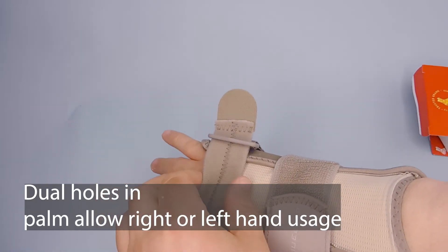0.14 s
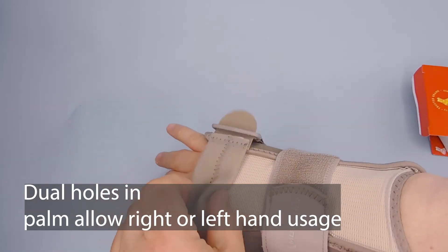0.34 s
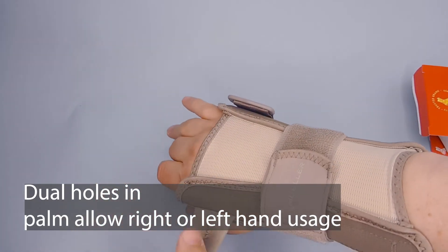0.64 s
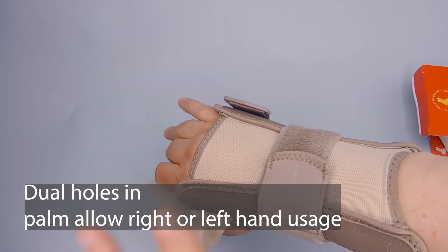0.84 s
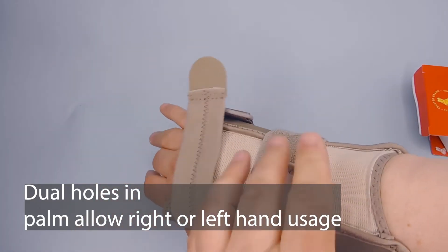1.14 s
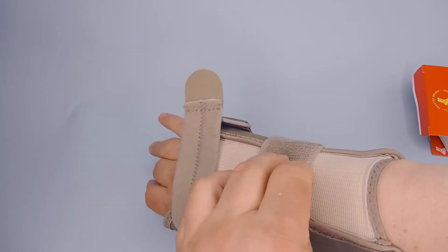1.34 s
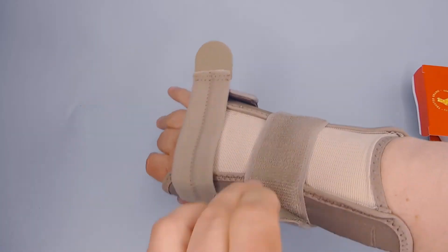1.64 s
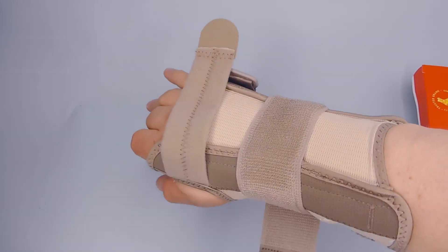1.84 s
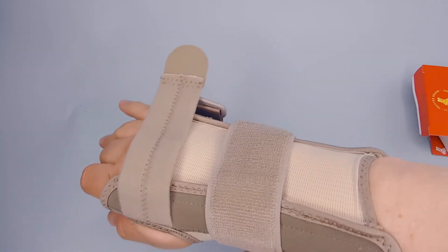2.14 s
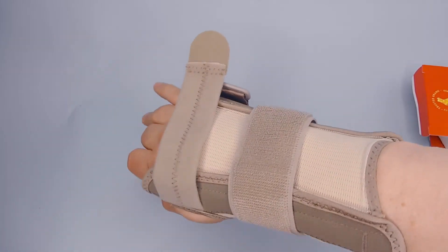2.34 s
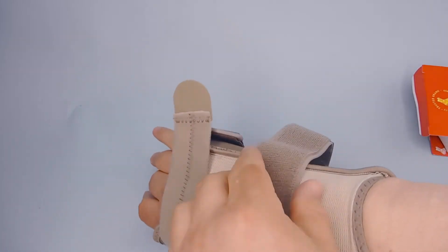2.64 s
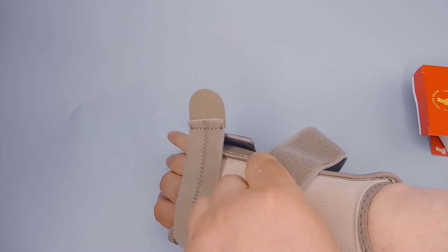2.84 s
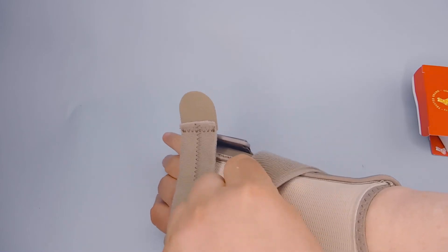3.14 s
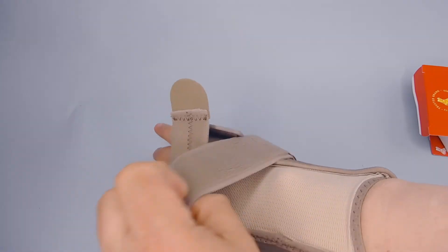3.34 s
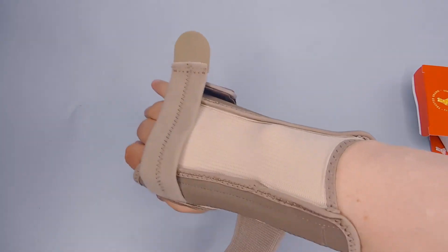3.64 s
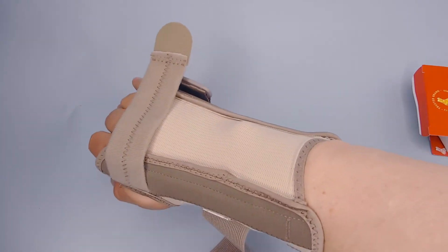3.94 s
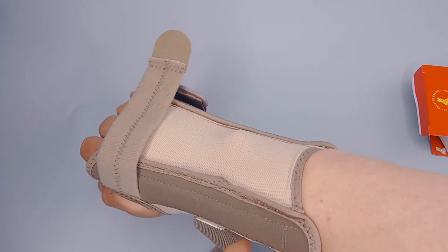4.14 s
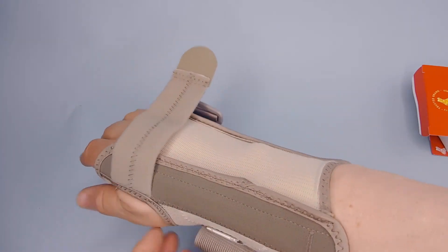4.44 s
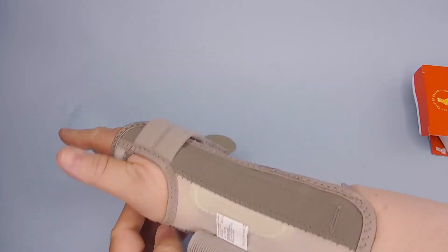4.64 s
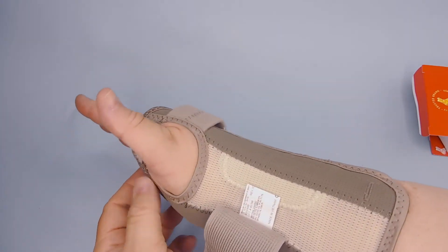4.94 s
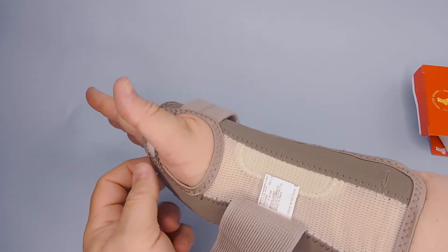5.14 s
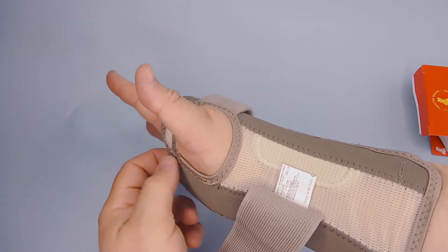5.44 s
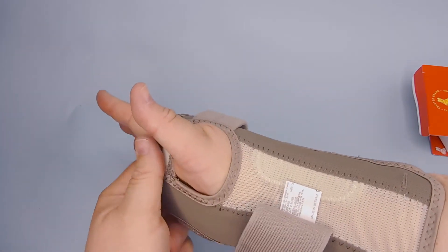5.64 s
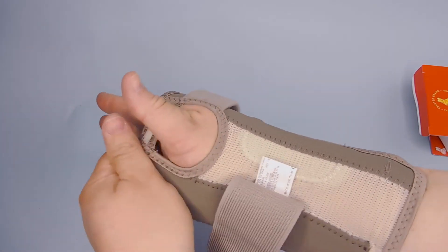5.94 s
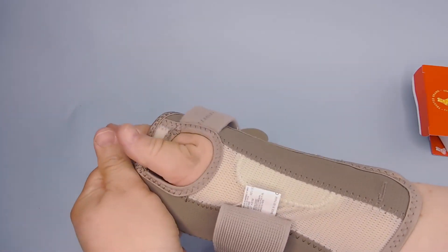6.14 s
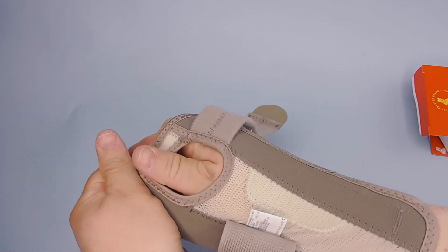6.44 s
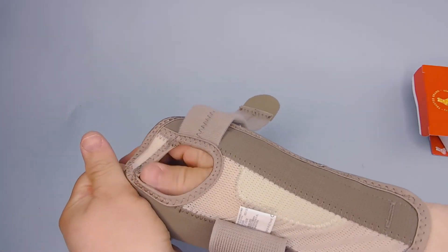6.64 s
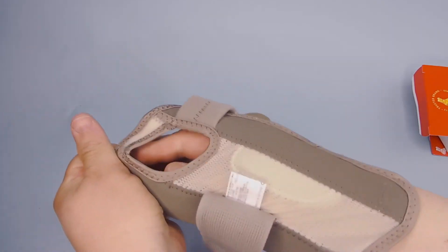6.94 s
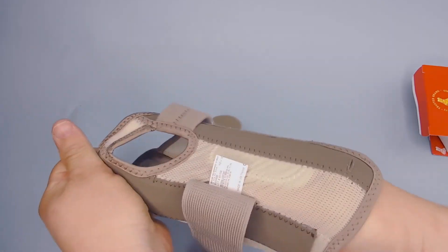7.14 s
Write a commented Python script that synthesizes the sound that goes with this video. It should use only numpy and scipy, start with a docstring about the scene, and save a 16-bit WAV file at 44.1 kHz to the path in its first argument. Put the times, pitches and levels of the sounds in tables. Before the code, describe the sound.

A fabric strap's hook-and-loop fastening crackles, then rips open; later the strap slaps a desk, followed by soft cloth rubbing and small splint clicks.

```python
"""Hooks snap singly, then in a dense tear, as a hand undoes a fabric wrist brace in a quiet room.
A small microphone close by also hears straps and skin rubbing the cloth, a strap slapping the desk and
a stiff splint clicking. Snaps are noise bursts through resonances, rubbing is filtered random ticks,
and slaps and clicks are damped sines. Hiss lies beneath; an echo in the microphone housing cuts a notch."""
import sys
import numpy as np
from scipy import signal
from scipy.fft import rfft, irfft
from scipy.io import wavfile
from scipy.ndimage import uniform_filter1d

SR = 44100
rng = np.random.default_rng(int(sys.argv[2]) if len(sys.argv) > 2 else 0)


def dump(signal):
    """Clip the signal to [-1, 1] and save it as 16-bit WAV at the path in sys.argv[1]."""
    limited = np.clip(np.atleast_2d(signal).T, -1, 1)
    pcm = np.round(limited * 32767).astype(np.int16)
    wavfile.write(sys.argv[1], SR, pcm)


N = 321048  # samples, about 7.3 s

# Hooks letting go: t/s, level/dB, centre f/Hz, treble against body/dB
HOOK_SNAPS = [(0.389, -51, 3020, -11), (0.3983, -42.5, 2790, -3), (0.4025, -43.5, 3120, -3),
              (0.4092, -47, 3800, -17), (0.4404, -46, 3530, -11), (0.448, -44, 3430, -10),
              (0.4549, -41, 3900, -12), (0.464, -55, 2410, -12), (1.261, -47, 3440, -11),
              (1.3644, -52, 2760, 7), (1.419, -43.5, 3040, 1), (1.4317, -37.5, 3960, 1.5),
              (1.4417, -37.5, 3360, -25), (1.4466, -42, 2860, -23), (1.4767, -45.5, 3000, 2),
              (1.5, -44.5, 3160, -10), (1.5394, -38.5, 3060, -16), (1.544, -38.5, 3380, 0.5),
              (1.559, -51, 3280, 0), (1.571, -47, 2740, 4), (1.5771, -35.5, 3170, -19),
              (1.588, -38, 2840, 2), (1.593, -32, 3300, -11), (1.5953, -35, 3800, -2),
              (1.606, -29, 3550, -23), (1.6162, -30, 3020, -12), (1.6168, -25, 2600, -6.5),
              (1.6286, -28, 2400, -18), (1.6323, -28, 3130, -16), (1.637, -28, 2430, -30),
              (1.647, -28, 3030, -7), (1.648, -26, 3400, -15), (1.6547, -26, 3300, -14),
              (1.6575, -23, 2300, -21), (1.6648, -22.5, 3630, -21), (1.6748, -25, 3420, -11),
              (1.68, -35, 3460, -18), (1.6877, -27, 3800, -12), (1.6942, -24, 3200, -2),
              (1.6967, -23.5, 3530, -27), (1.7, -33, 3170, -11), (1.709, -31, 2900, -14),
              (1.7152, -37, 3000, 0), (1.717, -33, 2640, 4), (1.727, -33, 3000, -3),
              (1.7336, -23.5, 4600, -9), (1.7389, -30, 2940, 7), (1.738, -26.5, 2520, 5),
              (1.7468, -31, 3000, -8), (1.7526, -37, 2870, 18), (1.7542, -28, 2740, -11),
              (1.8776, -56, 2960, 13), (1.8866, -57, 3370, 12), (1.943, -57.5, 3000, 11),
              (3.4403, -36, 2460, -7)]
# The strap tearing free: t/s, level/dB, fizz against level/dB, low rustle against level/dB
TEAR = [(1.55, -65, 5, -12), (1.591, -40.5, 1, -12), (1.62, -43, -12, -7), (1.66, -36.5, -12, -49),
        (1.7, -38.5, -2, -10.5), (1.725, -46.5, 2, -5), (1.74, -36, 1, -9), (1.754, -33, -3, -3),
        (1.77, -50, 2, -7), (1.78, -57, 6, -11)]
# Strokes of strap and skin over the cloth: loudest t/s, rise t/s, fall t/s, level/dB,
# then against level: fizz/dB, low rustle/dB; last, brightness tilt/dB
STROKES = [(.075, .04, 0.092, -61.5, -3, -10, 10), (.192, 0.013, .015, -62, -11, -13, 2),
           (.34, 0.065, 0.04, -63.5, -2, -11, 6), (.4, 0.018, 0.032, -50.5, -4, -4, 15),
           (.455, 0.044, 0.027, -53.5, 2, -11, 15), (.53, 0.098, 0.1, -63, -3, -10, 3),
           (.652, .03, .02, -70, 0., -13, 4), (.76, 0.061, 0.057, -69.5, 4, -11, 17),
           (.872, 0.046, 0.031, -53.5, -3, -12, 1), (.906, 0.014, 0.015, -54, -17, -16, -2),
           (1.269, 0.013, 0.035, -56.5, -2, -13, 8), (1.36, 0.09, 0.064, -62.5, 2, -2, 7),
           (1.445, 0.02, 0.022, -50.5, -1, -13, 8), (1.51, 0.072, 0.042, -57, -3, -15, 5),
           (1.79, 0.035, 0.058, -59, -2, -2, 2), (1.884, 0.028, 0.062, -58.5, 3, -11, 11),
           (1.97, 0.14, 0.044, -58, -4, -7, 4), (2.058, .05, 0.051, -54, -3, -14, 1),
           (2.132, 0.058, 0.035, -57.5, 0, -3, 10), (2.55, 0.054, 0.082, -57.5, -2, -9, 2.5),
           (2.71, 0.072, .05, -63.5, 5, -5, 11), (2.82, 0.071, 0.28, -62, 1.5, -5, 2),
           (2.95, 0.18, 0.12, -63, -5, -3.5, 3), (3.09, 0.049, 0.087, -65, -11, -3, -1),
           (3.21, .04, 0.068, -53.5, -4.5, -7.5, 6.5), (3.33, 0.036, .04, -59, 0, -4, 0),
           (3.37, 0.024, 0.022, -52.5, -10, -11, 4), (3.393, .006, .03, -50, -13, -12, 2),
           (3.425, 0.022, .012, -47, -12, -6, 4), (3.46, 0.03, 0.065, -56, -8, -7, 2),
           (3.6, 0.096, 0.1, -66, -6, -3, 6), (3.76, 0.094, 0.084, -64, -24, -3, -8),
           (3.88, 0.022, 0.019, -52.5, -26, -5, -4), (3.95, 0.082, 0.096, -61.5, -24, -9, -5),
           (4.26, 0.24, 0.054, -67.5, -3, 2, -2), (4.41, 0.068, 0.057, -57, -15, -7, -6),
           (4.5, .04, 0.21, -60.5, -26, -9, -10), (4.665, 0.025, .04, -56.5, -20, -12, -7),
           (4.78, 0.049, 0.026, -55, -37, -7, -22.5), (4.874, 0.07, 0.16, -57, -26, -8.5, -9.5),
           (5.014, 0.044, .02, -63, -5, -10, -9), (5.165, 0.067, 0.082, -56, -12, -7, -6),
           (5.265, .04, 0.019, -58, -8, -9, -7), (5.35, 0.044, 0.056, -61, -7, -14, 0),
           (5.405, 0.019, .025, -51, -12, -14, 0.), (5.45, .04, 0.061, -63.5, -15, -10, -7),
           (5.575, 0.054, 0.09, -59.5, -21, -4, -2), (5.675, 0.032, 0.045, -56.5, -4, -25, -7),
           (5.735, 0.069, 0.049, -46, -15, -39, 0), (5.85, 0.026, 0.056, -56.5, -12, -7, 2),
           (6.01, 0.13, 0.097, -52, -6.5, -14, 4), (6.15, 0.024, 0.063, -55.5, -15, -5, 1),
           (6.265, 0.11, 0.081, -56.5, -9, -9.5, 4.5), (6.435, 0.042, 0.065, -53.5, -9, -19, 1),
           (6.49, 0.054, 0.033, -58, -8, -9, 7.5), (6.616, .04, 0.068, -51, -5, -14, 10),
           (6.665, 0.063, 0.045, -50, -4, -17, 3), (6.84, 0.021, 0.05, -53, -3, -23, 3),
           (6.89, 0.058, 0.083, -48.5, -4, -23, 0.5), (7.01, 0.15, 0.067, -55, -19, -12, -4),
           (7.12, 0.12, 0.12, -44, -5.5, -38, 0), (7.27, .06, .06, -61, -6, -4, 0.)]
# Spectrum of the rubbed cloth, also used for the room tail: f/Hz, level/dB
CLOTH_SPECTRUM = [(200, -36), (500, -13), (1200, -8.5), (1600, -5.5), (2400, 2.5), (4000, 1), (6000, -2.5),
                  (8000, -13), (9500, -30)]
# Spectrum of the high fizz of the fibres: f/Hz, level/dB
FIZZ_SPECTRUM = [(5000, -34), (8000, -4.5), (11000, -4), (14000, -8.5), (16000, -16.5)]
# Spectrum of the low rustle of the cloth: f/Hz, level/dB
RUSTLE_SPECTRUM = [(100, -33), (250, -16.5), (400, -7), (600, -4), (1000, 0.5), (1500, -3.5), (2500, -17.5)]
# The brace turns its opening to the microphone: t/s, hollow sound against level/dB
HOLLOW_TURNS = [(0.0, -11.5), (2.9, -14), (3.3, -23), (4.6, -26), (5.1, -2), (5.5, -7.5), (6.1, -7),
                (6.7, -9.5), (7.28, -16.5)]
# Strap landing on the desk: t/s, level/dB, cloth settling against the desk's peak/dB
STRAP_SLAPS = [(3.7128, -16.5, -18.5), (3.8358, -37, -19)]
# Ringing modes of the desk: f/Hz, level/dB, t60/s
DESK_MODES = [(156, -14, 0.13), (285, -51, 0.066), (690, -2.5, 0.028), (1014, -0.5, 0.018),
              (1890, -0.5, 0.011), (2440, -5, 0.012), (3270, 6, 0.0036), (5500, -25, .004)]
# Spectrum of the cloth settling on the desk: f/Hz, level/dB
SETTLE_SPECTRUM = [(100, -21), (420, -7), (620, 1), (1100, 0.5), (2000, -3.5), (4000, -11.5), (7000, -16),
                   (12000, -26), (16000, -32)]
# Splint and buckle clicks: t/s, level/dB, ring f/Hz, ring t60/s, sharp tick against ring/dB
SPLINT_CLICKS = [(0.0483, -50.5, 1620, .016, -8), (3.5306, -53.5, 2400, .013, -6),
                 (4.1036, -47.5, 2390, 0.033, -20), (4.6475, -41.5, 1760, .02, -19),
                 (5.1926, -27, 1510, 0.012, -25), (5.1966, -35, 1590, 0.016, -19),
                 (5.2443, -27.5, 1604, 0.011, -11.5), (6.1684, -33.5, 2260, 0.0057, -27),
                 (6.1699, -37, 1980, 0.0075, -15), (6.2783, -38, 1490, .011, -16)]
# The strap jerks free and pushes air: t/s, level/dB, f/Hz
AIR_TUGS = [(1.694, -44, 230), (1.753, -44, 230)]
# Spectrum of the room and microphone hiss: f/Hz, level/dB
AIR_SPECTRUM = [(30, -22), (120, -7.5), (473, -0.5), (1630, -1), (3580, -7), (5310, -9.5), (7090, -9.5),
                (10000, -10.5), (12000, -12), (14800, -11.5), (16000, -9)]

STROKE_DROP_DB, STROKE_ROUND = 11, 1.3  # level lost one rise or fall from the peak; roundness of the top
TEAR_TILT_DB = 6  # brightness of the tear
IDLE_DB, IDLE_FIZZ_DB, IDLE_LOW_DB = -76.5, -3.5, -7  # the cloth never rests fully
HOLLOW_HZ, HOLLOW_WIDTH_HZ = 1604, 220
PATCH_DB = 1.5  # rms spread of the wandering colour of the rubbing
ROOM_DB, AIR_DB = -19.5, -59  # room tail against the hits; rms of the hiss
PREAMP_DB = -89.5  # flat hiss behind the microphone, before the band limit
NOTCH_HZ, NOTCH_SHARE = 8480, .985  # housing notch; echo strength against the direct sound
EDGE_HZ = 15820  # upper band limit


def snaps():
    """Each hook is a sharp crack, a second crack off the desk, and the strap buzzing after it."""
    out, t = np.zeros(N), np.arange(1500) / SR
    crack = decay(t, t60=.005)
    desk_crack = .45 * np.roll(crack, round(.0014 * SR))
    buzz = .1 * decay(t, t60=.03) * np.minimum(t / .001, 1)
    shape = crack + desk_crack + buzz
    treble_band = signal.butter(2, [6000, 13800], "band", fs=SR)
    strong = slice(0, 170)  # levels are set over this first part
    for s, db, hz, treble_db in HOOK_SNAPS:
        burst = shape * rng.standard_normal(len(t))
        burst[0] = 3.5  # the hook's first jump
        body = resonate(resonate(burst, hz, 1.2 * hz), hz, 6000)
        strap = resonate(burst, 580, 280)  # the whole strap flexes a little
        body = above(body, hz=1360) + 0.085 * body.std() / strap.std() * strap
        treble = signal.lfilter(*treble_band, burst)
        body = body / body[strong].std()
        treble = gain_of(treble_db) * treble / treble[strong].std()
        add(out, s, gain_of(db) * (body + treble))
    return out


def rub():
    """Fibres catch and slip in dense random ticks, swelling and thinning in clumps."""
    level, dull_gain, bright_gain, fizz_gain, low_gain = effort()
    tick_sizes = gain_of(1.9 * np.minimum(rng.exponential(1, N), 5)) * rng.standard_normal(N)
    ticks = tick_sizes * (rng.random(N) < .4)
    clumps = gain_of(0.59 * evened(uniform_filter1d(rng.standard_normal(N), size=250)))
    fibres = evened(ticks * clumps)

    hollow_db = np.interp(np.arange(N) / SR, *np.transpose(HOLLOW_TURNS))
    hollow = evened(resonate(fibres, HOLLOW_HZ, HOLLOW_WIDTH_HZ)) * gain_of(hollow_db)
    cloth = colour(fibres, CLOTH_SPECTRUM)
    dull = signal.filtfilt(*signal.butter(2, 3000, fs=SR), cloth)
    bright = cloth - dull
    body = dull_gain * dull + bright_gain * bright + level * hollow
    rustle = low_gain * colour(fibres, RUSTLE_SPECTRUM)
    fizz = fizz_gain * colour(fibres, FIZZ_SPECTRUM)
    return patchy(body + rustle + fizz)


def effort():
    """Amplitudes of whole, dull, bright, fizz and rustle; strokes, tear and idle add in power."""
    t = np.arange(0, N / SR + .002, .001)
    steady = np.zeros_like(t)
    s, rise, fall, db, fizz_db, low_db, tilt_db = np.transpose(STROKES)[:, :, None]
    before = (s - t) / np.maximum(rise, .003)
    after = (t - s) / np.maximum(fall, .003)
    away = np.where(t < s, before, after)
    stroke_db = db - STROKE_DROP_DB * away ** STROKE_ROUND

    at, *tear = np.transpose(TEAR)
    tear_db, tear_fizz_db, tear_low_db = (np.interp(t, at, column) for column in tear)
    tear_db[(t < at[0]) | (t > at[-1])] = -200  # inaudible outside the tear

    level = np.vstack([stroke_db, tear_db, IDLE_DB + steady])
    fizz = np.vstack([fizz_db + steady, tear_fizz_db, IDLE_FIZZ_DB + steady])
    low = np.vstack([low_db + steady, tear_low_db, IDLE_LOW_DB + steady])
    tilt = np.vstack([tilt_db + steady, TEAR_TILT_DB + steady, steady])
    parts = (0, -tilt / 2, tilt / 2, fizz, low)
    powers = [(gain_of(level + part) ** 2).sum(0) for part in parts]
    return [np.interp(np.arange(N) / SR, t, np.sqrt(power)) for power in powers]


def patchy(x):
    """The colour of the rubbing wanders in random gain patches of about 700 Hz by 30 ms."""
    z = signal.stft(x, nperseg=256, noverlap=192)[2]
    field = rng.standard_normal(z.shape[::-1]).T
    for _ in range(2):
        field = uniform_filter1d(field, size=3, axis=0)  # across frequency
        field = uniform_filter1d(field, size=15, axis=1)  # along time
    return signal.istft(z * gain_of(PATCH_DB * evened(field)), nperseg=256, noverlap=192)[1][:N]


def slaps():
    """The strap tip lands, then its length a moment later; the desk rings while the cloth settles."""
    out, t = np.zeros(N), np.arange(6000) / SR
    desk = sum(gain_of(db) * decay(t, t60) * np.sin(2 * np.pi * hz * t) for hz, db, t60 in DESK_MODES)
    ring = .8 * desk + np.roll(desk, round(.0012 * SR))  # tip, then length
    ring = ring / abs(ring).max()
    settling = decay(t, t60=0.14) * np.minimum(t / 0.0049, 1)
    for s, db, cloth_db in STRAP_SLAPS:
        cloth = colour(rng.standard_normal(len(t)), SETTLE_SPECTRUM) * settling
        add(out, s, gain_of(db) * (ring + gain_of(cloth_db) * cloth))
    return out


def clicks():
    """Splint and buckle: a short damped ring started by a sharp tick."""
    out, t = np.zeros(N), np.arange(2500) / SR
    shape = decay(t, t60=0.0053) + 0.18 * decay(t, t60=0.032)
    for s, db, hz, t60, tick_db in SPLINT_CLICKS:
        ring = decay(t, t60) * np.sin(2 * np.pi * hz * t)
        jolt = rng.standard_normal(len(t)) * shape
        jolt[0] = 1.6
        tick = resonate(resonate(jolt, 2300, 2700), 2700, 15300)
        add(out, s, gain_of(db) * above(ring + gain_of(tick_db) * tick, hz=1250))
    return out


def tugs():
    """The jerked strap gives one quick push of air and a slower, weaker pull back."""
    out = np.zeros(N)
    for s, db, hz in AIR_TUGS:
        u = np.arange(3000) * 2 * np.pi * hz / SR
        push, pull = np.exp(-u), 0.071 * np.exp(-u / 2.9)
        add(out, s, gain_of(db) * np.e * u * (push - pull))
    return out


def room_tail(hits):
    """The quiet room answers the hits with a short tail of decaying noise."""
    t = np.arange(6000) / SR
    tail = colour(rng.standard_normal(len(t)), CLOTH_SPECTRUM)
    tail = tail * decay(t, t60=.12) * np.minimum(t / .006, 1)
    return gain_of(ROOM_DB) * signal.fftconvolve(hits, tail / np.linalg.norm(tail))[:N]


def air():
    """Steady room and microphone hiss: noise filtered to its spectrum."""
    return gain_of(AIR_DB) * colour(rng.standard_normal(N), AIR_SPECTRUM)


def gain_of(db):
    """dB to amplitude."""
    return 10 ** (np.asarray(db) / 20)


def decay(t, t60):
    """Exponential decay, 60 dB down after t60 seconds."""
    return gain_of(-60 * t / t60)


def evened(x):
    """Scales to rms 1."""
    return x / np.sqrt(np.mean(x ** 2) + 1e-20)


def colour(x, spectrum):
    """Filters by a spectrum of f/Hz, level/dB, then scales to rms 1."""
    hz = np.fft.rfftfreq(len(x), 1 / SR)
    f, db = np.transpose(spectrum)
    gain = gain_of(np.interp(np.log(hz + 1), np.log(f), db))
    return evened(irfft(rfft(x) * gain, len(x)))


def resonate(x, hz, width):
    """Two-pole resonance; width in Hz sets its damping."""
    r = np.exp(-np.pi * width / SR)
    return signal.lfilter([1, 0, -r], [1, -2 * r * np.cos(2 * np.pi * hz / SR), r * r], x)


def above(x, hz):
    """Steep high-pass."""
    return signal.sosfilt(signal.butter(4, hz, "high", fs=SR, output="sos"), x)


def add(mix, s, sound):
    """Mixes a sound in at time s in seconds."""
    part = mix[round(s * SR):][:len(sound)]
    part += sound[:len(part)]


def scene():
    """All sources, a short room tail on the hits, and the steady hiss."""
    # small sources carry no bass
    hits = above(snaps() + clicks(), hz=305) + above(slaps(), hz=202) + tugs()
    return (hits + rub() + room_tail(hits) + air())[None]


def record(dry):
    """The housing echo arrives half a period late at the notch; preamp hiss and band limit follow."""
    hz = np.fft.rfftfreq(N, 1 / SR)
    echo = (1 + NOTCH_SHARE * np.exp(-1j * np.pi * hz / NOTCH_HZ)) / (1 + NOTCH_SHARE)
    heard = irfft(rfft(dry) * echo, N) + gain_of(PREAMP_DB) * rng.standard_normal(N)
    band_limit = signal.firwin(511, EDGE_HZ, window=("kaiser", 9), fs=SR)
    return signal.oaconvolve(heard, band_limit[None], "same")


dry = scene()
out = record(dry)
dump(out)
```